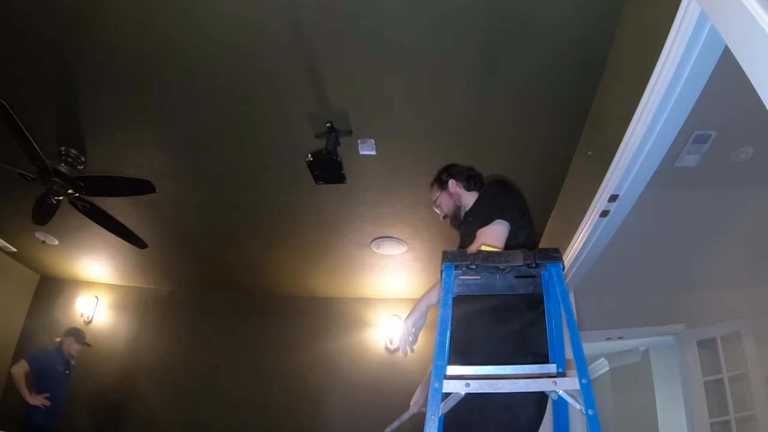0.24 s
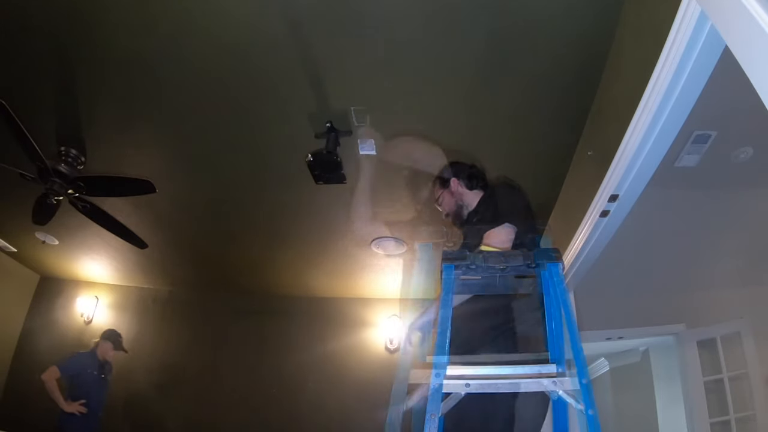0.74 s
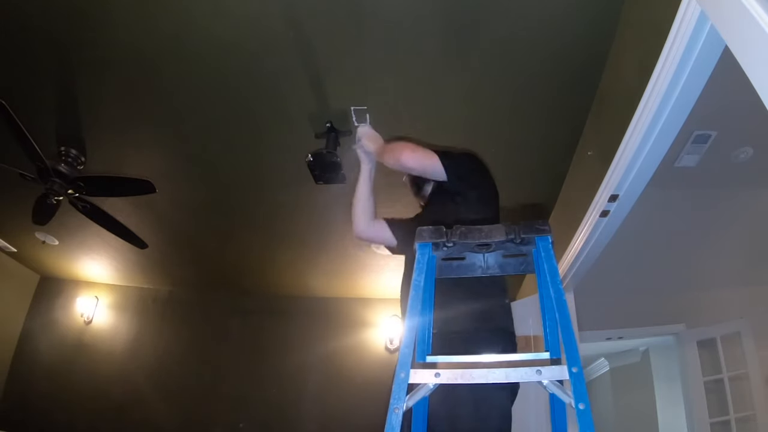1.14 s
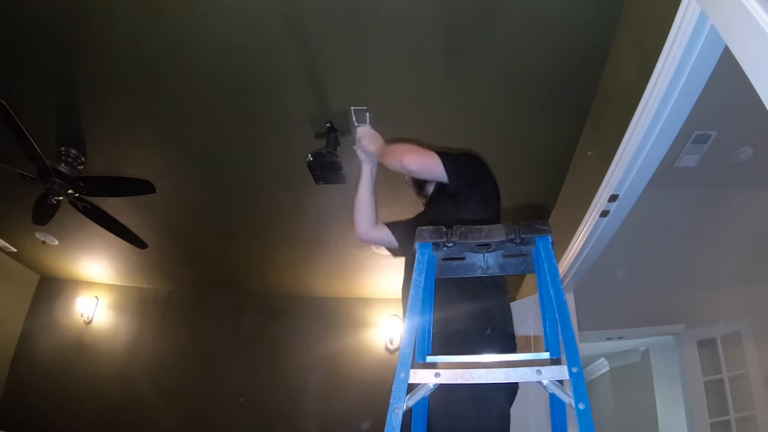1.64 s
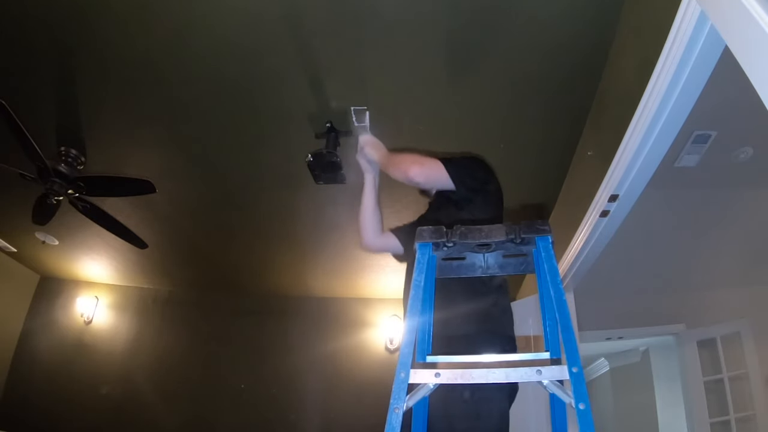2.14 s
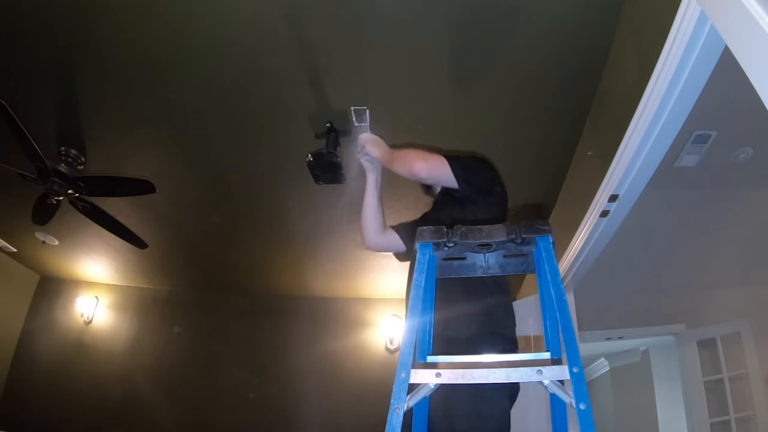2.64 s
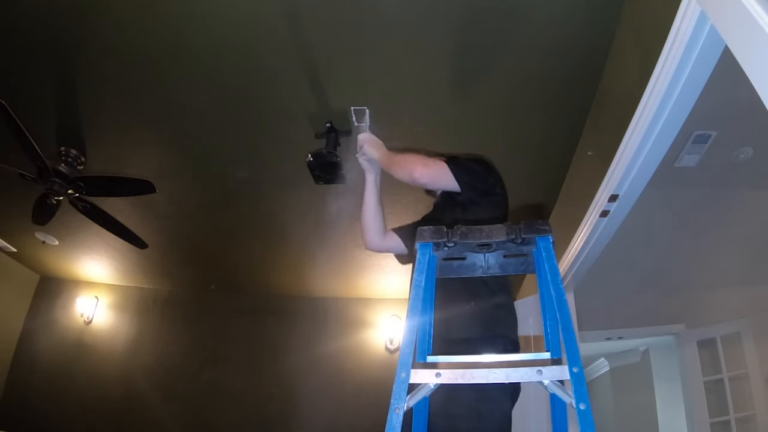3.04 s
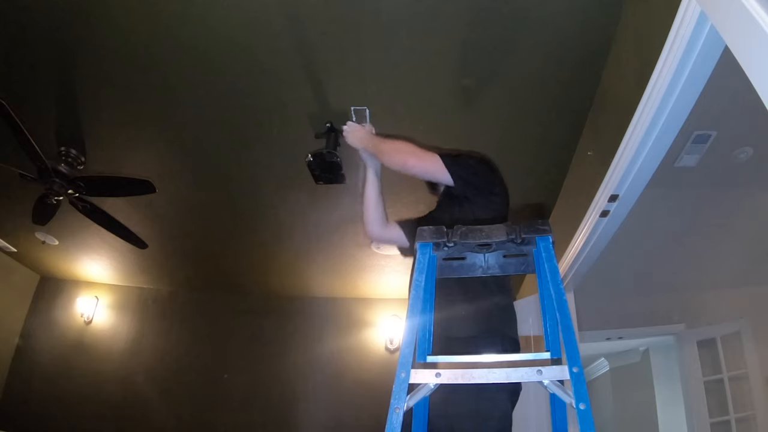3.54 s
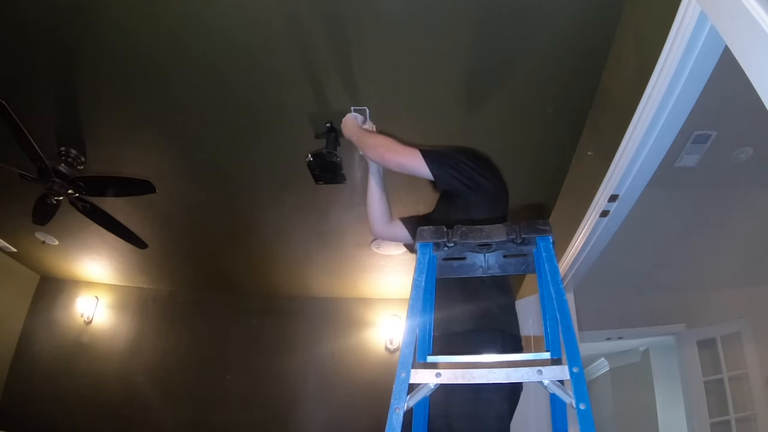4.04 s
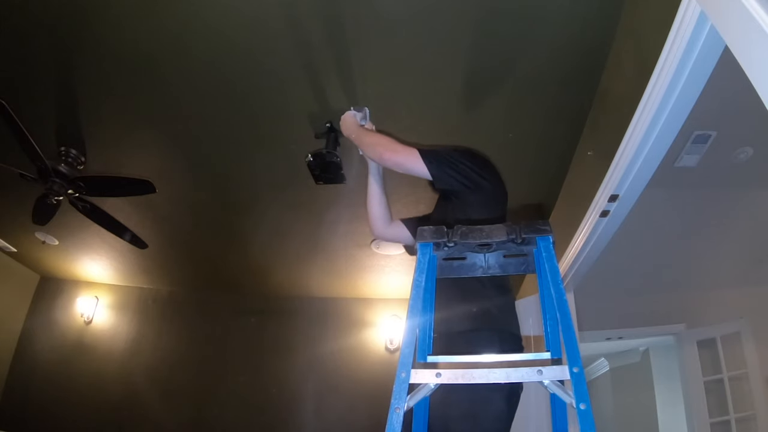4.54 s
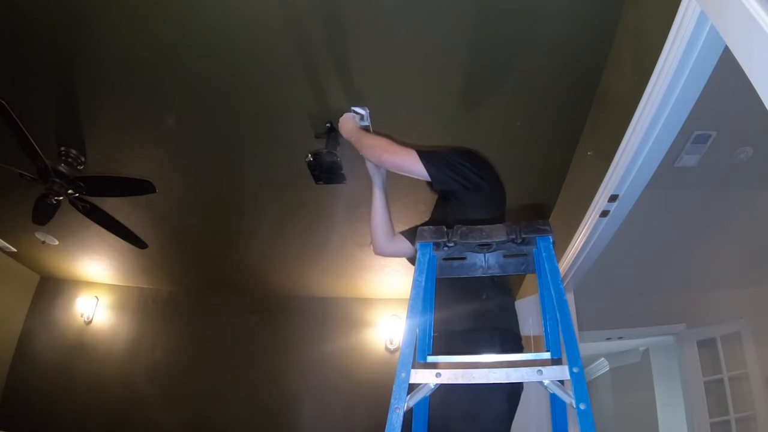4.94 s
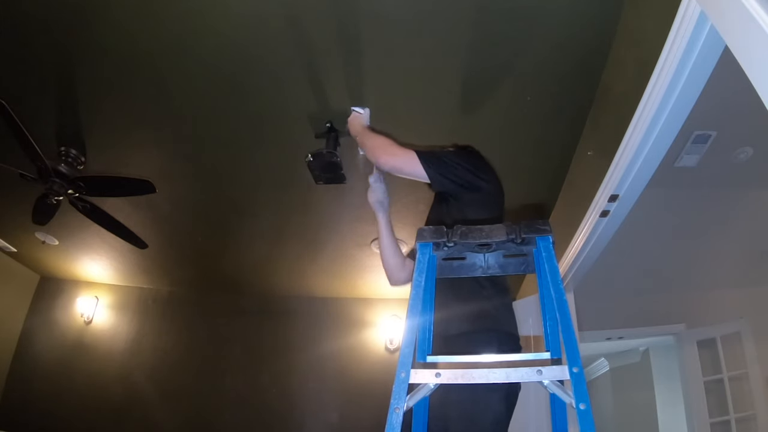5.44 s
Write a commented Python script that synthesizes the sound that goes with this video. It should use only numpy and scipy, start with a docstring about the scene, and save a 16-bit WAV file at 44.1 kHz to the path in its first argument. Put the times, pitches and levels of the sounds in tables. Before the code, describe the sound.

Three knocks on a hollow plasterboard ceiling, then a hand saw rasps rapidly back and forth, booming the board, before crumbs patter down.

```python
"""Over the hush of a house come three knocks, the last two close together; then a hand saw rasps back and forth
through a plasterboard ceiling. Each tooth kicks the board, which hums on its low modes at the tooth rate and sways;
the blade rings and gypsum hisses in the kerf. At the end crumbs patter down and the blade bumps the board.
Noise, kicks and sines shaped by resonances and level curves make the sources; random echo tails make the room."""
import sys
import numpy as np
from scipy import signal
from scipy.fft import rfft, irfft, next_fast_len
from scipy.io import wavfile
from scipy.ndimage import uniform_filter1d, map_coordinates

SR = 44100
rng = np.random.default_rng(int(sys.argv[2]) if len(sys.argv) > 2 else 0)


def int16_out(signal):
    """Quantize to a 16-bit WAV file."""
    q = np.round(np.clip(np.atleast_2d(signal).T, -1, 1) * 32767)
    wavfile.write(sys.argv[1], SR, q.astype(np.int16))


def gain_from_db(level_db):
    """Convert decibel levels to linear amplitude factors (20 dB per decade)."""
    decades = np.asarray(level_db, float) / 20
    return 10 ** decades


N = 250488


def unit(x):
    """Scaled to rms 1."""
    return x / np.sqrt(np.mean(x ** 2) + 1e-20)


def along(points, hz):
    """(Hz, value) points interpolated on a log frequency axis."""
    point_hz, value = np.transpose(points)
    return np.interp(np.log(hz + 1), np.log(point_hz + 1), value)


def curves(rows):
    """One value per sample for each column after the time in seconds."""
    s, *columns = np.transpose(rows)
    return [np.interp(np.arange(N) / SR, s, column) for column in columns]


def wobble(knots_per_s):
    """A smooth random curve through normally distributed knots."""
    knots = rng.standard_normal(int(N * knots_per_s / SR) + 4)
    return map_coordinates(knots, [np.arange(N) * knots_per_s / SR])


def filtered(x, response):
    """x through a complex response of frequency, zero-padded by half a second or more."""
    size = next_fast_len(N + SR // 2)
    return irfft(rfft(x, size) * response(np.fft.rfftfreq(size, 1 / SR)), size)[..., :N]


def modes(table):
    """Causal response of a set of resonances, alternating in sign."""
    def response(f):
        total = 0
        for k, (centre_hz, width_hz, db) in enumerate(table):
            damping = 1j * f * width_hz
            total = total + (-1) ** k * gain_from_db(db) * damping / (centre_hz ** 2 - f * f + damping)
        return total
    return response


def coloured(spectrum):
    """Noise of rms 1 with this spectrum."""
    return unit(filtered(rng.standard_normal(N), lambda hz: gain_from_db(along(spectrum, hz))))


def driven(force, db, response):
    """A body driven by a force whose strength follows db; the body rings on after the force drops."""
    return filtered(force * gain_from_db(db), response) / np.std(filtered(force, response))


def fading(start_s, rise_s, t60_s):
    """An envelope that starts at start_s, rises exponentially and dies by 60 dB per t60_s."""
    t = np.clip(np.arange(N) / SR - start_s, 0, None)
    return (1 - np.exp(-t / rise_s)) * gain_from_db(-60 * t / t60_s)


# House hush spectrum. Each row: frequency in Hz, relative density in dB per Hz.
HUSH_SPECTRUM = [(15, -21.5), (25, 3), (54, -9), (81, -12), (196, -3.5), (529, -22), (833, -16),
                 (2020, -30.5), (6370, -31.5), (9270, -37), (11500, -45), (15000, -60)]


def house_hush():
    """Two independent steady noises whose level stirs slowly together."""
    level_db = -62 + 1.5 * wobble(8)
    return gain_from_db(level_db) * np.array([coloured(HUSH_SPECTRUM), coloured(HUSH_SPECTRUM)])


# Echo decay. Each row: frequency in Hz, t60 in s.
ROOM_T60 = [(80, 0.67), (400, 0.25), (1500, 0.49), (8000, 0.31)]


def room(x):
    """Two echo tails, each frequency dying at its own speed; fresh random tails crossfade in every quarter second."""
    hop = SR // 4
    out = np.zeros((2, N + 2 * SR))
    padded = np.pad(x, (hop, 2 * hop))
    for start in range(0, N + hop, hop):
        piece = padded[start:start + 2 * hop] * signal.get_window("hann", 2 * hop)
        hz, t, z = signal.stft(rng.standard_normal((2, SR // 2)), SR, nperseg=256)
        decay = gain_from_db(-60 * t / along(ROOM_T60, hz)[:, None])
        tail = signal.istft(z * decay, SR, nperseg=256)[1]
        wet = signal.fftconvolve(piece[None], tail / np.linalg.norm(tail[0]), axes=1)
        out[:, start:start + wet.shape[1]] += wet
    return out[:, hop:hop + N]


# Port likeness. Each row: frequency in Hz, left-right correlation (0-1) for equally strong independent inputs.
PORT_CORRELATION = [(30, 0.59), (70, 1), (180, 0.99), (400, 0.87), (800, 0.12), (1600, 0.25), (3000, 0.48),
                    (4500, 0.79), (7000, 0.075), (14000, .05)]
# Port balance. Each row: frequency in Hz, left minus right in dB.
PORT_BALANCE = [(60, -1), (180, -2), (550, -3.5), (1650, 0.5), (4970, -1), (15000, 3.5)]


def spread(x, other):
    """Two microphone ports: x is their sum, other their difference, mixed by frequency."""
    def angle(hz):
        return np.arccos(np.clip(along(PORT_CORRELATION, hz), -1, 1)) / 2
    mid = filtered(x, lambda hz: np.cos(angle(hz)))
    side = filtered(other, lambda hz: np.sin(angle(hz)))
    ports = np.array([mid + side, mid - side])
    return filtered(ports, lambda hz: gain_from_db(along(PORT_BALANCE, hz) * [[.5], [-.5]]))


# Ceiling board modes. Each row: frequency in Hz, width in Hz, relative level in dB.
BOARD_MODES = [(102.4, 33.1, -3.5), (138.8, 18.26, 2), (173.8, 22.1, -2.5), (194.5, 17.3, -3),
               (221.7, 9.4, -7.5), (291.6, 19, -13.5), (338.4, 13.5, -18.5), (380.3, 23.2, -19.5),
               (456.2, 42, -25.5), (593.5, 39, -28), (635.6, 40, -30), (765, 26, -30), (905, 93, -31.5)]


def board(hz):
    """Response of the ceiling board's resonances."""
    return modes(BOARD_MODES)(hz)


# Falling crumbs. Each row: start in s, level in dB before the mix, patter t60 in s.
CRUMB_FALLS = [(4.638, -40, 0.22), (4.771, -57, 0.056), (4.81, -54, 0.038), (4.839, -48, 0.076),
               (4.934, -50.5, 0.05), (4.988, -46.5, 0.031), (5.038, -53.5, 0.072), (5.131, -35.5, 0.087),
               (5.151, -46.5, 0.1104), (5.184, -38, 0.094), (5.211, -43.5, 0.12), (5.231, -42.5, 0.087),
               (5.258, -42, 0.062), (5.342, -32.5, 0.079), (5.37, -37.5, 0.083), (5.41, -51.5, 0.27),
               (5.658, -40.5, 0.18)]
# Grit spectrum. Each row: frequency in Hz, relative density in dB per Hz.
PATTER_SPECTRUM = [(450, -61), (800, -26), (950, -9), (1150, -4.5), (1470, -5.5), (1830, -9), (2470, -14),
                   (2990, -5.5), (3500, -8), (4880, -14.5), (6230, -5.5), (7430, -5.5), (9760, -27),
                   (15500, -35.5)]
# Resonances of what the crumbs land on. Each row: frequency in Hz, width in Hz, relative level in dB.
HOLLOW_MODES = [(1130, 120, 0), (1420, 160, -1), (2980, 120, -7)]


def crumbs():
    """Each fall is a tick and short patter of grit; what it lands on rings briefly."""
    patter = sum(gain_from_db(db) * fading(s, 0.0031, np.clip(t60_s, .01, .5)) for s, db, t60_s in CRUMB_FALLS)
    hollow = driven(patter * rng.standard_normal(N), 0, modes(HOLLOW_MODES))
    grit = patter * gain_from_db(1.1 * wobble(300)) * coloured(PATTER_SPECTRUM)
    hollow_db = -4  # re grit
    return grit + gain_from_db(hollow_db) * np.std(grit) * hollow


# Light bumps of the blade coming out. Each row: start in s, level in dB before the mix.
BLADE_TOUCHES = [(4.765, -40), (4.84, -40.5), (4.885, -48.5), (4.987, -47), (5.053, -54.5), (5.242, -49.5),
                 (5.4, -54.5)]


def blade_touches():
    """Each bump of the blade is a small thud of noise through the board modes."""
    touch = sum(gain_from_db(db) * fading(s, 0.0033, 0.18) for s, db in BLADE_TOUCHES)
    thud = filtered(rng.standard_normal(N), lambda hz: board(hz) * hz ** 2 / (1 + (hz / 300) ** 6))
    return touch * unit(thud)


# Knocks. Each row: start in s, then levels before the mix of thud, deep boom, upper boom, crack in dB,
# boom time scale in s (the boom starts 2 of these late and rises over 5).
KNOCK_BLOWS = [(0.193, -23, -6, -6, -58.5, 0.0064), (0.502, -34.5, -52.5, -24.5, -41.5, 0.0019),
               (0.564, -37, -32.5, -23.5, -55.5, 0.0021)]
# Thud spectrum. Each row: frequency in Hz, relative density in dB per Hz.
THUD_SPECTRUM = [(100, -23.5), (200, 3.5), (300, -9.5), (584, -15), (800, -20.5), (1000, -29),
                 (1770, -39.5), (3000, -64), (6600, -120)]
# Crack spectrum. Each row: frequency in Hz, relative density in dB per Hz.
CRACK_SPECTRUM = [(350, -45), (600, 4), (1560, -9), (2220, -15), (7650, -14), (8640, -17.5), (9490, -45),
                  (11000, -30.5), (15000, -36.5)]


def knocks():
    """Blows that thud through the board, boom on its slow modes a moment later and crack at the contact."""
    out = np.zeros(N)
    for s, thud_db, deep_db, upper_db, crack_db, scale_s in KNOCK_BLOWS:
        boom_s = s + 2 * scale_s
        turn = 2 * np.pi * (np.arange(N) / SR - boom_s)
        deep = np.sin(78 * turn) + 0.56 * np.sin(68 * turn) + 0.26 * np.sin(42 * turn)  # close modes beat
        boom = gain_from_db(deep_db) * deep + gain_from_db(upper_db) * np.sin(153 * turn)
        out += gain_from_db(thud_db) * fading(s, 0.0012, 0.33) * coloured(THUD_SPECTRUM)
        out += fading(boom_s, 5 * scale_s, 0.25) * boom
        out += gain_from_db(crack_db) * fading(s, 0.0013, 0.24) * coloured(CRACK_SPECTRUM)
    return out


CONTROL_STEP = 16  # samples per point of the coarse control curves


def full(v):
    """A coarse control curve at the sample rate."""
    return np.interp(np.arange(N), CONTROL_STEP * np.arange(len(v)), v)


# Saw strokes; the first and the last three are the blade going in, dragging and sliding out.
# Each row: peak in s, rise in s, fall in s, teeth per s at the peak, crumbling share (0-1) at the peak,
# then nominal peak levels of board hum, bite, rasp, dust in dB.
SAW_STROKES = [(0.74, .05, 0.0897, 150, .5, -40.5, -55, -62.5, -96),
               (0.9, 0.094, 0.12, 163, .4, -22.5, -31.5, -44.5, -55),
               (1.088, 0.11, 0.098, 160, .7, -23, -31.5, -40.5, -62.5),
               (1.271, .09, 0.12, 137, 0.51, -16.5, -31.5, -41, -56.5),
               (1.51, .09, .09, 158, .2, -18, -31, -41, -59),
               (1.726, .11, 0.099, 170, 0.32, -15, -26, -39.5, -50.5),
               (1.95, 0.13, 0.091, 166, 0.61, -20.5, -26, -41, -63.5),
               (2.14, 0.099, 0.088, 163, 0.5, -13.5, -27, -38.5, -48),
               (2.33, .1, 0.087, 166, 0.26, -18.5, -26, -41, -66),
               (2.509, 0.088, 0.096, 140, 0.05, -17.5, -28.5, -44, -64),
               (2.75, 0.096, .1, 148, .25, -24, -26.5, -42.5, -56.5),
               (2.95, 0.1, 0.083, 148, 0.4, -20.5, -25.5, -45.5, -65),
               (3.15, .1, 0.089, 112, .4, -22.5, -31.5, -46.5, -78),
               (3.359, 0.0951, .09, 125, 0.7, -30, -38, -50.5, -82),
               (3.571, 0.0991, .09, 146, .5, -19.5, -28.5, -44, -72),
               (3.745, .08, .1, 112, 0.45, -19, -27, -43.5, -71.5),
               (3.965, 0.093, 0.058, 125, 0.7, -26, -33.5, -48, -72),
               (4.1, 0.075, 0.12, 111, .45, -23, -33.5, -47.5, -68),
               (4.349, 0.084, 0.1307, 190, 0.5, -30, -33.5, -44, -66),
               (4.54, 0.088, 0.065, 150, .55, -30.5, -47, -58.5, -93),
               (4.83, .15, 0.15, 150, 0.1, -60.5, -66, -55.5, -94),
               (5.0, .06, 0.082, 158, .3, -54, -63, -62.5, -93)]


def stroke_phase(lead_s):
    """Time from each stroke's peak in s, and phase: 0 at the peak, 1 at the turns of the arm, more beyond."""
    peak_s, rise_s, fall_s = np.transpose(SAW_STROKES)[:3, :, None]
    since_s = np.arange(0, N, CONTROL_STEP) / SR + lead_s - peak_s
    return since_s, np.maximum(-since_s / np.abs(rise_s), since_s / np.abs(fall_s))


def current_stroke():
    """Time from the peak, phase, tooth rate and crumbling share of the stroke under way."""
    teeth_per_s, crumbling = np.transpose(SAW_STROKES)[3:5]
    since_s, phase = stroke_phase(0)
    now = np.argmin(phase, axis=0)
    since_s, phase = (full(np.take_along_axis(v, now[None], axis=0)[0]) for v in (since_s, phase))
    return since_s, phase, full(teeth_per_s[now]), full(crumbling[now])


def stroke_level(peak_db, shape):
    """Level in dB of one layer: each stroke swells to its peak and drops towards the turns."""
    drop_db, rising, falling, lead_s = shape
    since_s, phase = stroke_phase(lead_s)
    each_db = peak_db[:, None] - drop_db * phase ** np.where(since_s < 0, rising, falling)
    return full(10 * np.log10(np.sum(gain_from_db(np.maximum(each_db, -150)) ** 2, axis=0)))


# Sudden catches of the teeth as a stroke bites in. Each row: start in s, jump of bite, rasp and dust in dB,
# jump of hum in dB.
TOOTH_CATCHES = [(0.818, -0.5, 5), (1.264, 3.5, 2.5), (1.46, 4, 4), (1.672, 1.5, 6), (2.065, -0.5, 7.5),
                 (2.662, 5.5, 6.5), (2.739, 1, 2), (2.924, 4, 3.5), (3.515, 1.5, 1), (3.706, 1.5, 9),
                 (4.276, 7, 4.5)]


def catching():
    """Jumps in dB that start at once and ease off exponentially."""
    s, *jumps_db = np.transpose(TOOTH_CATCHES)[:, :, None]
    t = np.arange(N) / SR - s
    ease_s = 0.016
    return [np.sum(jump * (t > 0) * np.exp(-np.abs(t) / ease_s), axis=0) for jump in jumps_db]


# How each layer follows a stroke. Each: drop at the turn of the arm in dB, curvature of the rise, of the fall
# (1 peaked, 3 square), lead in s.
HUM_STROKE = (13.6, 2.84, 2.22, 0.0089)
BITE_STROKE = (15.4, 1.71, 1.4, 0.0019)
RASP_STROKE = (13.66, 2.13, 1.1, 0.0013)
DUST_STROKE = (36, 0.92, 2, .002)


def layer_levels():
    """Levels of hum, bite, rasp and dust in dB: strokes plus catches."""
    peaks_db = np.transpose(SAW_STROKES)[5:]
    shapes = (HUM_STROKE, BITE_STROKE, RASP_STROKE, DUST_STROKE)
    hum_db, bite_db, rasp_db, dust_db = map(stroke_level, peaks_db, shapes)
    sharp_db, deep_db = catching()
    return hum_db + deep_db, bite_db + sharp_db, rasp_db + sharp_db, dust_db + sharp_db


# Teeth quicken within a stroke, later drag. Each row: time in s, change of rate in teeth per s per s.
TOOTH_SPEEDUP = [(.7, 200), (2.9, 297.5), (3.6, -19.5), (4.6, -100)]


def teeth_passed(since_s, teeth_per_s):
    """Running count of teeth: the unsteady cutting rate summed over time."""
    rate = teeth_per_s + curves(TOOTH_SPEEDUP)[0] * np.clip(since_s, -.12, .12)
    return np.cumsum(rate * (1 + 0.04077 * wobble(40))) / SR


def tooth_kicks(teeth):
    """One impulse of uneven strength per tooth, rms 1 overall."""
    return unit(np.diff(np.floor(teeth), prepend=0) * gain_from_db(3 * wobble(120)))


def arm_push(hz):
    """The push of the arm reaches only the low modes."""
    return 1 / (1 + (hz / 235) ** 8)


def board_hum(kicks, crumbling, hum_db):
    """Tooth kicks, blended with noise where gypsum crumbles, drive the low board modes."""
    push = (1 - crumbling) * kicks + crumbling * rng.standard_normal(N)
    return driven(push, hum_db + 1.3 * wobble(24.92), lambda hz: arm_push(hz) * board(hz))


def tooth_bite(kicks, bite_db):
    """Kicks in stronger noise drive the higher board modes."""
    snap = kicks + 1.88 * rng.standard_normal(N)
    return driven(snap, bite_db + 2.1 * wobble(24.89),
                  lambda hz: (1 - arm_push(hz)) * board(hz) / (1 + (hz / 1100) ** 4))


# Slowest board modes. Each row: frequency in Hz, width in Hz, relative level in dB.
SWAY_MODES = [(39.8, 4.4, -0.5), (62.6, 10, -4.5), (71.4, 8.5, -5.5)]
# Board sway. Each row: time in s, mean level in dB before the mix.
SWAY_LEVEL = [(.68, -56.5), (.8, -54), (1.0, -33), (1.3, -30), (1.6, -26.5), (1.75, -38.5), (2.15, -41),
              (2.399, -33), (2.8, -29), (3.4, -33.5), (3.6, -43), (3.8, -29.5), (4.0, -39.5), (4.12, -38),
              (4.259, -42), (4.349, -34.5), (4.581, -33.5), (4.662, -59.5), (5.1, -92)]


def board_sway():
    """Noise through the slowest board modes, its level following the table and drifting."""
    onset = [(SWAY_LEVEL[0][0] - .03, -150)]
    level_db = curves(onset + SWAY_LEVEL)[0] + 3 * wobble(9.3)
    noise = rng.standard_normal(N)
    return gain_from_db(level_db) * unit(filtered(noise, lambda hz: modes(SWAY_MODES)(hz) / (1 + (hz / 95) ** 6)))


# Rasp spectrum. Each row: frequency in Hz, relative level in dB.
RASP_SPECTRUM = [(530, -25), (900, -4), (1100, -10.5), (1350, -3.5), (2080, -13.5), (3020, -8),
                 (4040, -19.5), (4380, -24.5), (5250, -18), (7240, -9.5), (10000, -37), (13000, -66),
                 (22000, -120)]


def kerf_rasp(grit, rasp_db):
    """Uneven grit noise shaped to the scrape in the kerf."""
    return driven(grit, rasp_db, lambda hz: gain_from_db(along(RASP_SPECTRUM, hz)))


# The free length of blade changes as the cut moves on. Each row: time in s, short-blade ring,
# long-blade ring over the rasp in dB, before mode levels and drift.
RING_LEVELS = [(.7, -15.5, -16), (1.07, -11, -17), (2.098, -10.5, -10.5), (2.75, -14.5, -8),
               (3.3, -25.5, -7), (4.1, -17.5, -9), (4.45, -17, -9.5), (4.65, -27.5, -10.5)]
# Short-blade modes. Each row: frequency in Hz, width in Hz, relative level in dB.
SHORT_BLADE_MODES = [(616, 12, 7), (925, 16, 0), (1785, 90, -2), (4350, 140, 0), (7300, 500, -5)]
# Long-blade modes. Each row: frequency in Hz, width in Hz, relative level in dB.
LONG_BLADE_MODES = [(2515, 320, 3.5), (2993, 170, 3), (3426, 240, -1), (3697, 70, -1)]


def blade_ring(grit, rasp_db, since_s, phase):
    """Grit noise drives the blade modes; the short ring favours a stroke's start, the long ring its end."""
    blades = (SHORT_BLADE_MODES, LONG_BLADE_MODES)
    early_db_per_s = (41.5, -14.5)
    turn_drop_db = 1  # rings less than it rasps where the arm turns
    out = np.zeros(N)
    for blade, ring_db, early in zip(blades, curves(RING_LEVELS), early_db_per_s):
        ring_db = ring_db - early * np.clip(since_s, -.12, .12)
        for hz, width_hz, db in blade:
            level_db = rasp_db + ring_db + db - turn_drop_db * np.minimum(phase, 1)
            level_db = level_db + 2.2 * wobble(6)  # each mode drifts by itself
            out += driven(grit * rng.standard_normal(N), level_db, modes([(hz, width_hz, 0)]))
    return out


# Dust spectrum. Each row: frequency in Hz, relative density in dB per Hz.
DUST_SPECTRUM = [(5000, -39.5), (8500, -9), (11500, -17), (13200, -21), (15600, -32.5)]


def gypsum_dust(scrape, dust_db):
    """Gypsum hisses in the kerf: treble noise that swells with each tooth."""
    return gain_from_db(dust_db) * scrape * coloured(DUST_SPECTRUM)


def patchy(x, depth_db):
    """Random patches of gain over time and frequency: the teeth catch here and there."""
    z = signal.stft(x, nperseg=256)[2]
    field = uniform_filter1d(rng.standard_normal(z.shape), size=3, axis=0)
    field = uniform_filter1d(field, size=4, axis=1)
    return signal.istft(z * gain_from_db(depth_db * unit(field)), nperseg=256)[1][:N]


def saw():
    """Teeth kick the board at the cutting rate and scrape gypsum in the kerf."""
    hum_db, bite_db, rasp_db, dust_db = layer_levels()
    since_s, phase, teeth_per_s, crumbling = current_stroke()
    crumbling = np.clip(crumbling + 0.23 * phase ** 2, 0, 1)  # more where the arm turns
    teeth = teeth_passed(since_s, teeth_per_s)
    kicks = tooth_kicks(teeth)
    low = board_hum(kicks, crumbling, hum_db) + tooth_bite(kicks, bite_db) + board_sway()
    scrape = (1 + 0.05 * np.cos(2 * np.pi * teeth)) * gain_from_db(0.81 * wobble(45))  # swells with each tooth
    grains_db = 1.85 * wobble(700) + 1.93 * wobble(170)  # grains break off unevenly
    grit = scrape * rng.standard_normal(N) * gain_from_db(grains_db)
    rasp = kerf_rasp(grit, rasp_db) + blade_ring(grit, rasp_db, since_s, phase)
    return low + patchy(rasp + gypsum_dust(scrape, dust_db), depth_db=2.0)


def scene():
    """Direct sound and echo of all sources over the hush of the house."""
    hush = house_hush()
    low = crumbs() + blade_touches()
    close = saw() + knocks()
    near, far = room(close + gain_from_db(4.5) * low)  # the crumbs land farther off, with more echo
    echo_db = [(150, -16.5), (600, -5.5), (4000, -6)]  # (Hz, dB): bass comes mostly straight from the board
    echo = filtered(near, lambda hz: gain_from_db(along(echo_db, hz)))
    pair = spread(gain_from_db(-2) * close + echo + hush[0], gain_from_db(-1) * far + hush[1])
    return pair + low * gain_from_db([[-5.5], [-2.5]])


def top_cut(x):
    """Nothing passes above the cut-off."""
    return signal.sosfilt(signal.butter(12, 15700, fs=SR, output="sos"), x)


def record(dry):
    """The finished stereo mix, ready to write."""
    return top_cut(dry)


dry = scene()
out = record(dry)
int16_out(out)
```